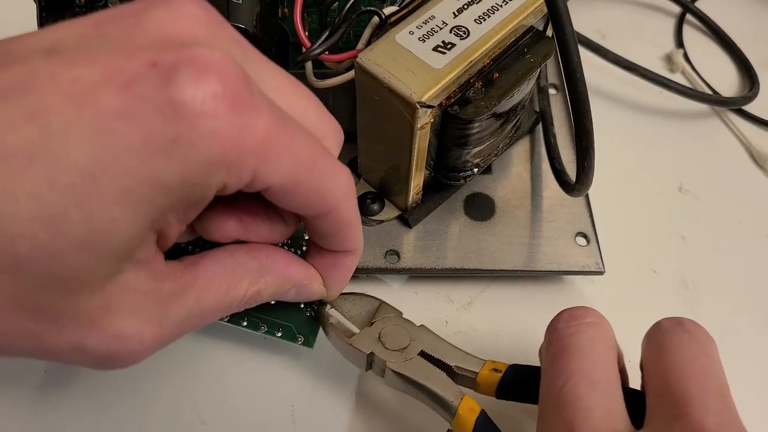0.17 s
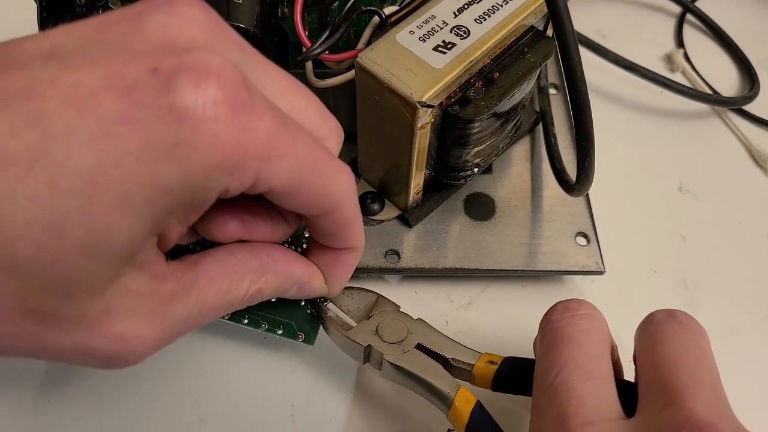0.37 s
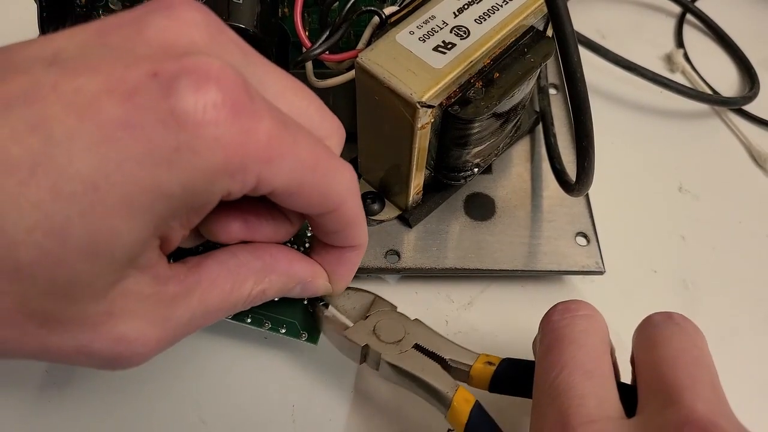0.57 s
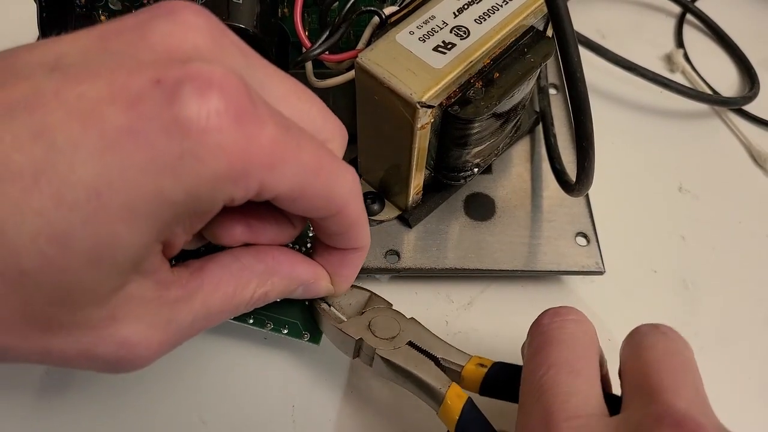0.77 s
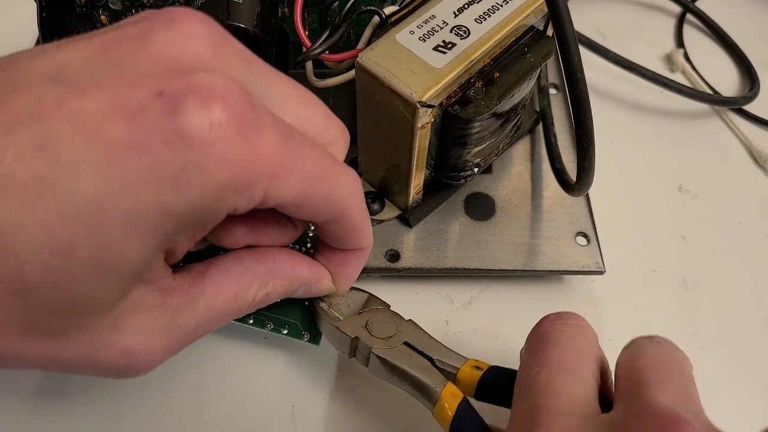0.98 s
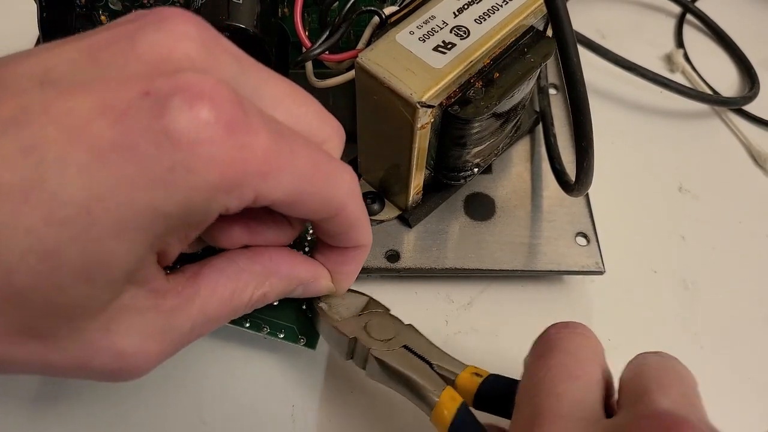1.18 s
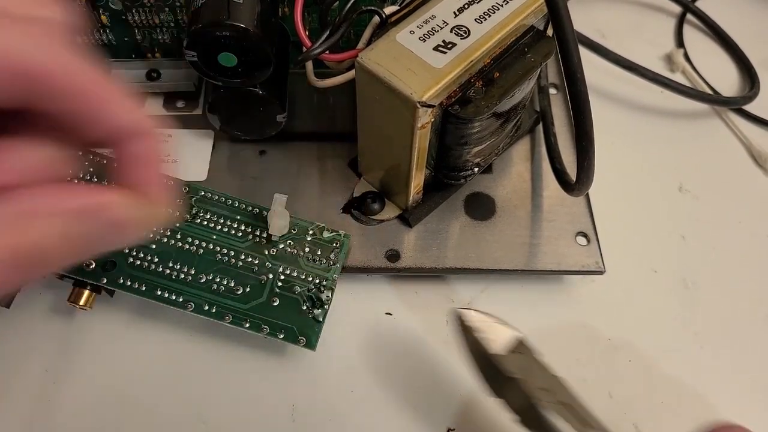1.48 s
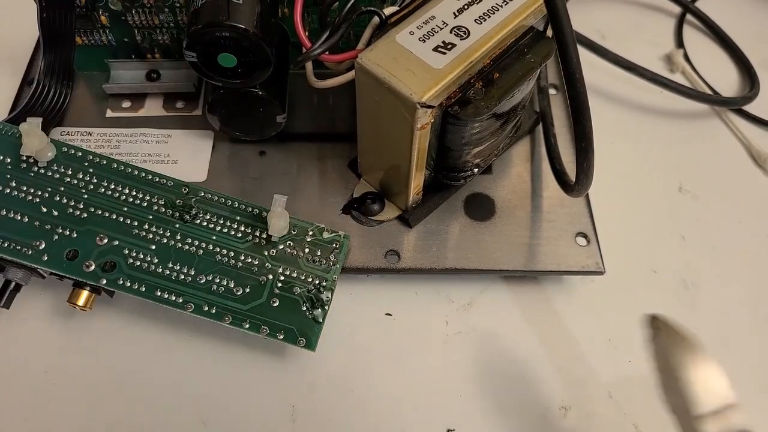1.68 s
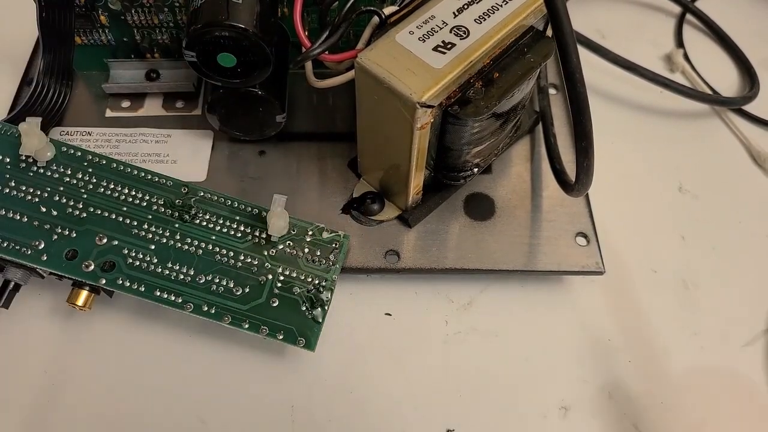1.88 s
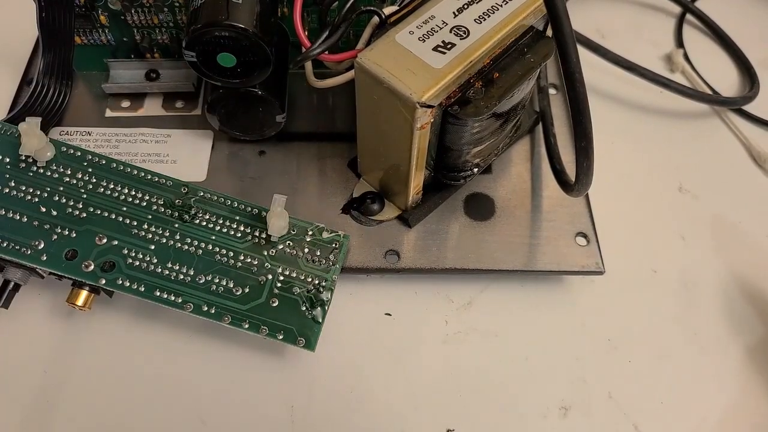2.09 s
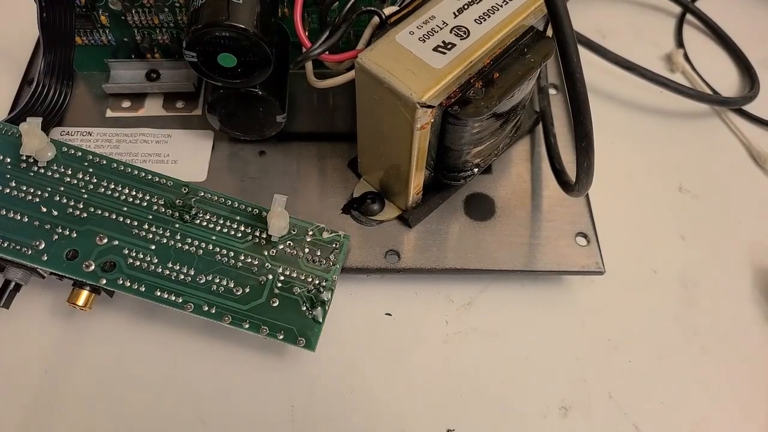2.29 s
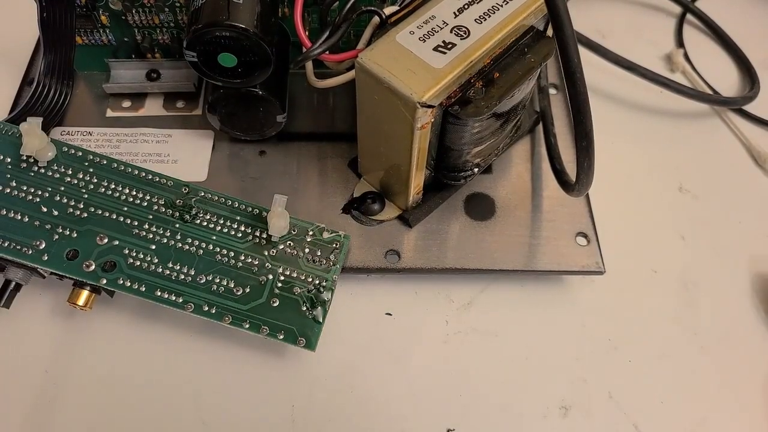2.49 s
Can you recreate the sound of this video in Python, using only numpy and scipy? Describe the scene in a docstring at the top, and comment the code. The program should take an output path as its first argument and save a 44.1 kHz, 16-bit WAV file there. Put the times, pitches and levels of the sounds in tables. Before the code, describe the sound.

Side cutters snip a wire lead with one sharp crack, then knock down on a bench.

```python
"""A workbench in a small room, where side cutters work on a circuit board. The dry pivot squeaks,
the jaws tap around a lead, and the lead parts with a crack that rings the board and shakes the
chassis below. The hand lets the board go and the sleeve rustles away. The cutters are put down
with two hard knocks, each a clatter of bench and steel over the soft thud of the hand.
A short echo and a faint hiss surround it all."""
import sys
import numpy as np
from scipy import signal
from scipy.fft import rfft, irfft
from scipy.io import wavfile
from scipy.ndimage import uniform_filter1d

SR = 44100
rng = np.random.default_rng(int(sys.argv[2]) if len(sys.argv) > 2 else 0)


def output_pcm(signal):
    """Save a mono or channel-first signal as 16-bit PCM at the path in sys.argv[1].

    Samples are clipped to [-1, 1] before scaling.
    """
    pcm = np.clip(np.atleast_2d(signal).T, -1, 1) * 32767
    wavfile.write(sys.argv[1], SR, np.round(pcm).astype(np.int16))


N = 116865
RING_N = 16384  # samples given to each one-shot
WIDE_HZ = 1210  # the stereo image is fully open from about here up

# Room tone and microphone hiss. Each row: frequency in Hz, level in dB.
AIR_COLOUR = [(25, 2.5), (100, -15.5), (240, -1.5), (400, -23), (800, -30), (1100, -14.5), (1600, -20),
              (3000, -10), (4500, -19), (5800, -17), (6500, -4.5), (7400, -50), (12000, -21), (16000, -32)]
# Tone of the hand and sleeve. Each row: frequency in Hz, level in dB.
RUSTLE_COLOUR = [(25, -11), (80, -6.5), (150, -7), (290, 5), (430, -11), (600, 2), (780, -14.5), (1000, -8),
                 (1400, -15), (2300, -17.5), (3900, -15), (5000, -20.5), (7000, -29), (9500, -35.5),
                 (16000, -34)]
# Fader ride on the rustle. Each row: time in seconds, level in dB.
RUSTLE_RIDE = [(0, -71), (.3, -77.5), (.62, -71), (.95, -74.5), (1.45, -74), (1.66, -69.5), (1.78, -62),
               (1.95, -63.5), (2.12, -59), (2.22, -64), (2.65, -62.5)]
# Length of the room's tail. Each row: frequency in Hz, t60 in seconds.
ECHO_DECAY = [(100, 0.34), (500, 0.36), (1000, 0.3351), (1900, 0.22), (3500, 0.13), (5500, 0.41),
              (14000, 0.06)]
# Strength of the room's tail. Each row: frequency in Hz, level in dB.
ECHO_COLOUR = [(60, -16.5), (200, -6.5), (500, -11), (1100, -9.5), (2000, -5.5), (5000, -10.5),
               (8000, -11.5), (16000, -10.5)]
# Faint scrapes. Each row: start and length in seconds, resonance and width in Hz, level in dB.
SCRAPE_CUES = [(.055, .06, 2900, 600, -60), (1.58, .15, 1100, 140, -69), (1.718, .03, 1500, 450, -61),
               (1.74, .28, 3650, 700, -70), (1.76, .22, 1860, 200, -67), (1.919, .014, 3300, 1100, -56),
               (1.95, .3, 600, 150, -67), (2.02, .24, 900, 180, -64), (2.07, .07, 2100, 700, -66)]
# Pivot squeaks. Each row: start and length in seconds, first and last pitch in Hz, level in dB.
SQUEAK_CUES = [(0.034, 0.027, 2280, 2130, -43.5), (0.669, 0.017, 2335, 2250, -43.5)]
# Taps on the board. Each row: start in seconds, then chassis ring, thud, clack and tick levels in dB.
TAP_CUES = [(.074, -53.5, -51.5, -49.5, -55.5), (.105, -59, -50.5, -55, -67.5),
            (.203, -89, -63, -85, -53.5), (0.2643, -43.5, -45, -42.5, -62), (.298, -52, -49, -73, -72),
            (.316, -46, -37.5, -43.5, -53), (0.38, -56.5, -49.5, -66, -56), (.507, -67, -43, -40.5, -55),
            (0.536, -55.5, -47, -62, -56), (.554, -53.5, -49, -53.5, -49.5),
            (0.607, -62, -66.5, -43.5, -45.5), (.623, -48, -40, -56, -66), (.744, -60.5, -53, -71, -81),
            (0.816, -58, -42.5, -53, -53.5), (1.151, -51.5, -52, -62, -68), (1.21, -56.5, -54.5, -71, -87),
            (1.546, -73, -47.5, -64, -72), (1.557, -55.5, -47.5, -51, -63), (1.615, -77, -42.5, -51.5, -56),
            (1.721, -51.5, -72, -62, -53.5), (1.735, -72, -38.5, -63, -65), (1.996, -67, -39, -64, -77),
            (2.111, -68, -69, -56, -58)]
# Dull thud, board clack and metal tick. Each row: frequency in Hz, level in dB.
DULL_COLOUR, CLACK_COLOUR, TICK_COLOUR = [(25, -29), (60, -5.5), (110, -2), (200, 1.5), (330, 1.5),
                                          (480, -9), (900, -11.5), (4000, -47.5)], [(60, -24.5), (300, -4.5), (550, 9.5), (830, -10.5),
                                                        (1100, 7.5), (1450, -7.5), (2300, -17), (4000, -27),
                                                        (16000, -45)], [(200, -44.5), (1500, 3),
                                                                       (2400, -7.5), (3000, 5.5),
                                                                       (3800, -13.5), (4700, -3.5),
                                                                       (8000, -28.5), (10500, -24),
                                                                       (16000, -32)]
# Modes of the circuit board (with the cutters' own steel ring near 1.8 and 2 kHz), its chassis, the bench top
# and the bench's low thud. Each row: frequency in Hz, level in dB, t60 in seconds.
BOARD_MODES, CHASSIS_MODES = [(1083, -5, 0.038), (1279, -11, .05), (1703, -4.5, 0.035), (1780, -22.5, 0.18),
                              (1997, -20.5, 0.28), (2185, 8.5, 0.0087), (2905, -3.5, 0.032),
                              (3116, -10, .04), (4390, -4.5, .025), (5380, -21, .2)], [(99.6, -11, 0.2), (166.8, -6, 0.29), (237.9, -4, 0.26),
                                             (268.5, -7, 0.21), (350, -13, 0.033)]
BENCH_MODES, BENCH_LOW_MODES = [(169.7, -8, 0.25), (337, -7.5, 0.031), (422, -14.5, .1), (543.2, -1, 0.11),
                                (665, -6, 0.18), (716.7, -7.5, 0.096), (845, -5, 0.061), (980, -27, 0.3),
                                (1097, 8, 0.071), (1162, 6, 0.031), (1342, -18, 0.075), (1501, -11, 0.19),
                                (1991, -1.5, 0.089), (2138, -8.5, 0.11)], [(48, -9, 0.087), (79, 2.5, 0.053)]
# Hand thuds, and thin ticks just before the last knock. Each row: start in seconds, level in dB.
THUD_CUES, THIN_TICK_CUES = [(2.279, -40), (2.325, -29), (2.368, -36), (2.583, -36)], [(2.5244, -45.5), (2.5396, -47)]
# The bench's low shudder and the thin ticks' sparkle. Each row: frequency in Hz, level in dB.
SHUDDER_COLOUR, THIN_TICK_COLOUR = [(25, -0.5), (50, 1), (95, -5), (160, -19), (500, -52.5)], [(500, -40), (7500, -30), (9500, 3), (12000, 7),
                                                     (14000, 17.5), (16500, 1)]
# Contacts and rebounds on the bench.
# Each row: start in seconds, ring, clatter and steel levels in dB, low-pass cutoff in Hz.
KNOCK_CUES = [(2.3310, -22.5, -8, -45, 990), (2.3365, -34.5, -15.5, -47, 1310),
              (2.3515, -34, -25.5, -57, 1440), (2.578, -19.5, -9, -42.5, 407),
              (2.5852, -18.5, -6.5, -22, 2310), (2.5880, -25.5, -14, -27.5, 2500),
              (2.5920, -18, -11, -55, 1950)]
# Dense bench clatter and the chink of steel jaws. Each row: frequency in Hz, level in dB.
CLATTER_COLOUR, STEEL_COLOUR = [(30, -18), (100, -19), (200, -0.5), (600, 3), (1200, 3.5), (2000, -2),
                                (2700, -7.5), (5000, -8.5), (16000, -69)], [(500, 8), (3500, 7.5), (5600, -8.5), (6900, 9.5),
                                                 (8000, -11), (10300, -5.5), (13000, -14), (15200, -11),
                                                 (17000, -27)]
# Crack of the parting lead and its bright first instant. Each row: frequency in Hz, level in dB.
CRACK_COLOUR, SNAP_COLOUR = [(60, -30), (250, -7), (700, -8), (1100, -2.5), (2200, 3), (4500, -1),
                             (6500, -12), (9500, -19), (12500, -37.5), (16000, -23)], [(300, -20), (2000, -3.5), (4500, 5), (6500, -12),
                                                 (9500, -1), (12500, -8), (16000, -4.5)]


def amp(db):
    """Decibels to gain."""
    return 10 ** (np.asarray(db) / 20)


def pan(db):
    """Stereo gains that put the left side db above the right."""
    return amp(np.array([[db], [-db]]) / 2)


def curve(points, hz):
    """Read (Hz, value) points on a log-frequency axis."""
    point_hz, values = np.array(points, float).T
    return np.interp(np.log(np.maximum(hz, 1)), np.log(point_hz), values)


def freqs(size):
    """Frequencies of a spectrum's bins."""
    return np.fft.rfftfreq(size, 1 / SR)


def fall(t60):
    """A decay that loses 60 dB in t60 seconds."""
    return np.exp(-np.log(1000) * np.arange(RING_N) / SR / t60)


def strike(t60, rise_s):
    """A percussive envelope: quick attack, exponential tail."""
    return fall(t60) * (1 - fall(rise_s * np.log(1000)))


def add(out, start, sound):
    """Drop a one-shot into the mix at a time in seconds."""
    i = max(int(start * SR), 0)
    out[:, i:i + RING_N] += sound[..., :max(N - i, 0)]


def noise(size):
    """Stereo white noise, narrow in the bass and wide in the treble."""
    mid, side = rfft(rng.standard_normal((2, size)))
    width = np.minimum(freqs(size) / WIDE_HZ + .1, 1)
    return irfft(np.array([mid + width * side, mid - width * side]) / np.sqrt(1 + width ** 2), size)


def noise_bed(colour):
    """Steady coloured noise of unit level."""
    bed = irfft(rfft(noise(N)) * amp(curve(colour, freqs(N))), N)
    return bed / bed.std()


def response(colour):
    """A minimum-phase EQ of unit power, so nothing rings ahead of an attack."""
    gain = amp(curve(colour, freqs(RING_N)))
    cepstrum = irfft(np.log(gain / np.sqrt(np.mean(gain ** 2))))
    cepstrum[1:RING_N // 2] *= 2
    cepstrum[RING_N // 2 + 1:] = 0
    return np.exp(rfft(cepstrum))


def burst(colour, t60, rise_s):
    """Countless short resonances struck at once: an even, decaying noise in a given colour."""
    envelope = strike(t60, rise_s)
    spectrum = rfft(noise(RING_N) * envelope)
    local_power = uniform_filter1d(abs(spectrum) ** 2, size=160, axis=-1)
    flattened = spectrum * np.sqrt(np.sum(envelope ** 2) / local_power)
    fade_out = np.clip(2 - np.linspace(0, np.pi, RING_N), 0, 1)
    return irfft(flattened * response(colour)) * fade_out


def ring(modes):
    """Struck modes; the higher ones reach left and right out of step."""
    t, out = np.arange(RING_N) / SR, 0
    for k, (hz, db, t60) in enumerate(modes):
        skew = rng.choice([-1, 1]) * min(hz / WIDE_HZ, 1) ** 2 * np.pi / 4
        tone = np.sin(2 * np.pi * hz * t + np.array([[skew], [-skew]]))
        out = out + (-1) ** k * amp(db) * fall(t60) * tone
    return out * (1 - fall(.001))


def soften(sound, hz):
    """A soft contact leaves out the highs."""
    return signal.sosfilt(signal.butter(2, hz, fs=SR, output="sos"), sound)


def air():
    """The quiet room and a faint hiss lie under everything."""
    return amp(-72) * noise_bed(AIR_COLOUR)


def room_echo(dry):
    """The small room's diffuse tail, with its own decay time in each octave."""
    spectrum, hz, tail = rfft(noise(RING_N)), freqs(RING_N), 0
    octave = np.clip(np.log2(np.maximum(hz, 1) / 64), 0, 8)
    for k in range(9):
        band = irfft(spectrum * np.maximum(1 - abs(octave - k), 0))
        envelope = strike(curve(ECHO_DECAY, 64 * 2 ** k), rise_s=.003)
        tail = tail + band * envelope / np.sqrt(np.sum(envelope ** 2))
    gain = np.sqrt(np.mean(amp(curve(ECHO_COLOUR, hz)) ** 2))
    impulse = gain * irfft(rfft(tail) * response(ECHO_COLOUR))
    return signal.fftconvolve(dry, impulse, axes=1)[:, :N]


def sleeve_rustle():
    """Hand and sleeve rub unevenly, most as the arm draws away."""
    t, flicker_hz = np.arange(N) / SR, 38
    flicker_db = 1.5 * np.interp(t * flicker_hz, np.arange(1024), rng.standard_normal(1024))
    ride_db = np.interp(t, *np.array(RUSTLE_RIDE).T)
    return noise_bed(RUSTLE_COLOUR) * amp(ride_db + flicker_db)


def scrapes():
    """Each light rub of hand or cutters excites one resonance, which swells and fades."""
    out, t = np.zeros((2, N)), np.arange(RING_N) / SR
    for start, length, hz, width, db in SCRAPE_CUES:
        resonance = 1 / (1 + (2 * (freqs(RING_N) - hz) / width) ** 2)
        rub = irfft(rfft(noise(RING_N)) * resonance)
        swell = np.sin(np.pi * np.minimum(t / length, 1))
        add(out, start, amp(db) * swell * rub / rub.std())
    return out


def pivot_squeaks():
    """The dry pivot sticks and slips in short falling tones, left of centre."""
    out, t = np.zeros((2, N)), np.arange(RING_N) / SR
    wobble_depth, glide_curve, octave_db = .015, .39, -15.5
    for start, length, first_hz, last_hz, db in SQUEAK_CUES:
        progress = np.minimum(t / length, 1)
        glide_hz = first_hz + (last_hz - first_hz) * progress ** glide_curve
        wobble = uniform_filter1d(rng.standard_normal(RING_N), size=100)
        pitch_hz = glide_hz * (1 + wobble_depth * wobble / wobble.std())
        phase = 2 * np.pi * np.cumsum(pitch_hz) / SR
        tone = np.sin(phase) + amp(octave_db) * np.sin(2 * phase)
        add(out, start, amp(db) * np.sin(np.pi * progress) * tone)
    return out * pan(4.5)


def board_taps():
    """Jaws and fingers nudge the board, which rings briefly and thumps on the chassis."""
    out, chassis = np.zeros((2, N)), ring(CHASSIS_MODES)
    board = amp(-5.5) * soften(ring(BOARD_MODES), hz=1445)
    for start, ring_db, thud_db, clack_db, tick_db in TAP_CUES:
        thud = amp(thud_db) * burst(DULL_COLOUR, t60=.039, rise_s=.0038)
        clack = amp(clack_db) * (board + burst(CLACK_COLOUR, t60=.022, rise_s=.0019))
        tick = amp(tick_db) * burst(TICK_COLOUR, t60=.04, rise_s=.00058)
        add(out, start, amp(ring_db) * chassis + thud + clack + tick)
    return out * pan(.5)


def thin_ticks():
    """Two tiny, glassy ticks lead into the last knock."""
    out = np.zeros((2, N))
    for start, db in THIN_TICK_CUES:
        add(out, start, amp(db) * burst(THIN_TICK_COLOUR, t60=.018, rise_s=.0002))
    return out


def hand_thuds():
    """The hand lands softly on the bench, and a low shudder follows."""
    out = np.zeros((2, N))
    thud = soften(ring(BENCH_LOW_MODES), hz=110) * pan(8)
    for start, db in THUD_CUES:
        shudder = amp(-11.5) * burst(SHUDDER_COLOUR, t60=.3, rise_s=.005)
        add(out, start, amp(db) * (thud + shudder))
    return out


def bench_knocks():
    """The cutters land twice, each time in a few quick contacts that ring the bench and chink the jaws."""
    out, bench = np.zeros((2, N)), ring(BENCH_MODES)
    for start, ring_db, clatter_db, steel_db, cutoff_hz in KNOCK_CUES:
        clatter = amp(clatter_db) * burst(CLATTER_COLOUR, t60=.039, rise_s=.0002)
        body = soften(amp(ring_db) * bench + clatter, cutoff_hz)
        chink = amp(steel_db) * burst(STEEL_COLOUR, t60=.032, rise_s=.0002)
        add(out, start, body * pan(-1) + chink * pan(-3))
    return out


def snip():
    """The jaws bite, the lead parts with a crack; board and chassis spring back and the hand jolts."""
    out, break_s, bite_ahead_s = np.zeros((2, N)), 1.0273, .0014
    bite = amp(-21.5) * burst(CRACK_COLOUR, t60=.019, rise_s=.0008)
    crack = amp(-11) * burst(CRACK_COLOUR, t60=.019, rise_s=.0008)
    board = amp(-21) * ring(BOARD_MODES)
    snap = amp(-23.5) * burst(SNAP_COLOUR, t60=.018, rise_s=.0001)
    chassis = amp(-33.5) * ring(CHASSIS_MODES)
    jolt = amp(-39.5) * burst(DULL_COLOUR, t60=.15, rise_s=.002)
    add(out, break_s - bite_ahead_s, bite)
    add(out, break_s, crack + board + snap + chassis + jolt)
    return out


def scene():
    """The tool work feeds the room's echo; rustle and air sit dry beneath it."""
    pivot, handling, cut = pivot_squeaks(), board_taps() + scrapes(), snip()
    landing = bench_knocks() + hand_thuds() + thin_ticks()
    echo_send = amp(.5) * pivot + handling + cut + amp(-.5) * landing
    return pivot + handling + cut + landing + room_echo(echo_send) + sleeve_rustle() + air()


def record(dry):
    """A soft clip rounds the highest peaks and a steep low-pass trims the top."""
    ceiling, top_hz = .9, 16600
    rounded = dry / (1 + (dry / ceiling) ** 6) ** (1 / 6)
    return signal.sosfilt(signal.ellip(10, .1, 80, top_hz, fs=SR, output="sos"), rounded)


dry = scene()
out = record(dry)
output_pcm(out)
```